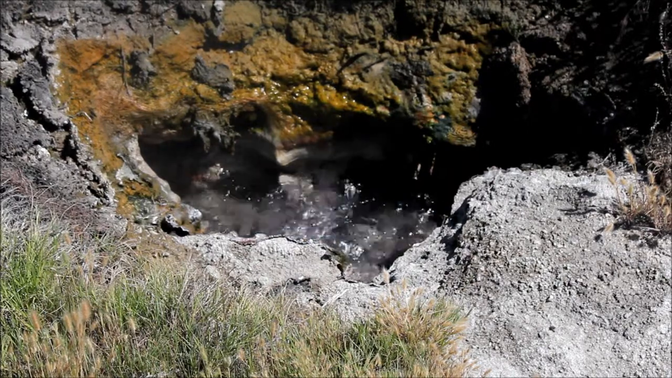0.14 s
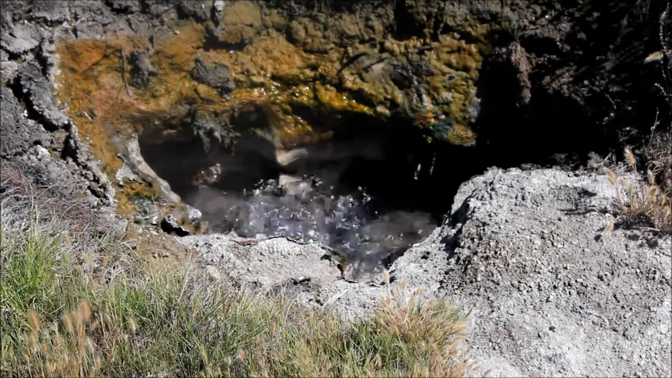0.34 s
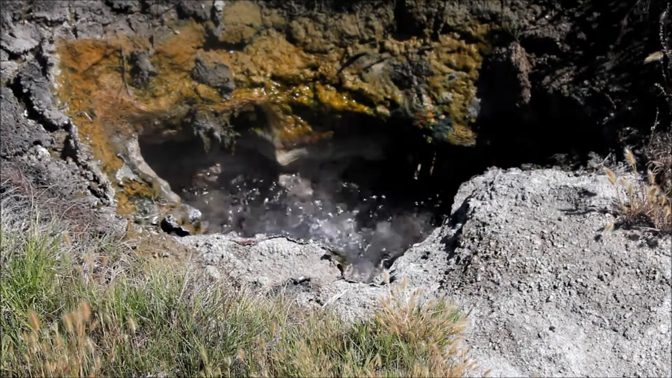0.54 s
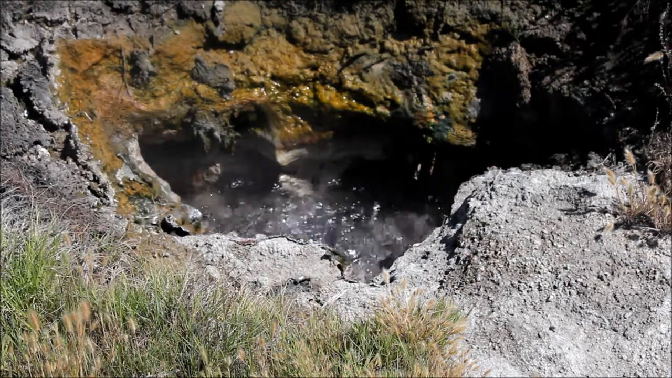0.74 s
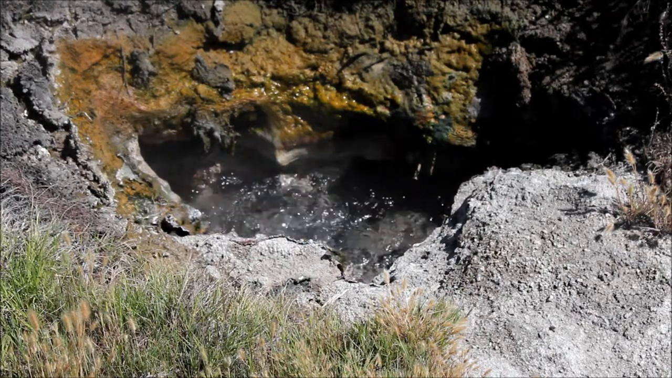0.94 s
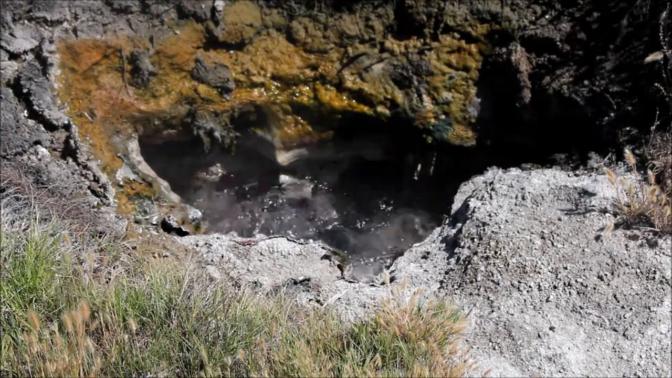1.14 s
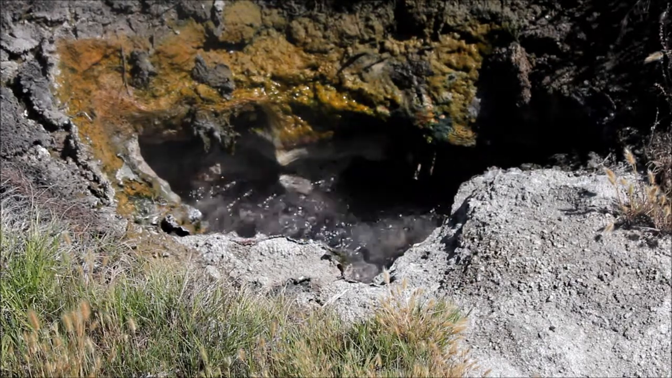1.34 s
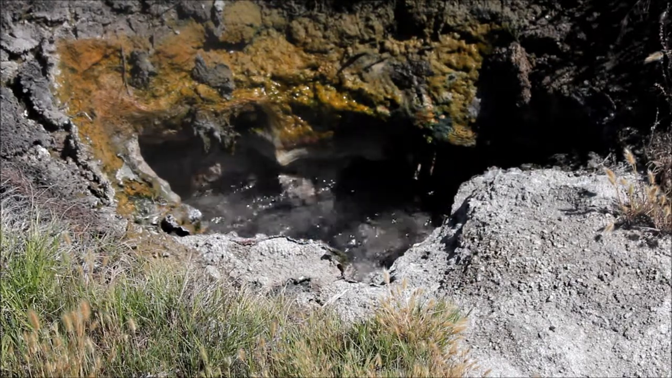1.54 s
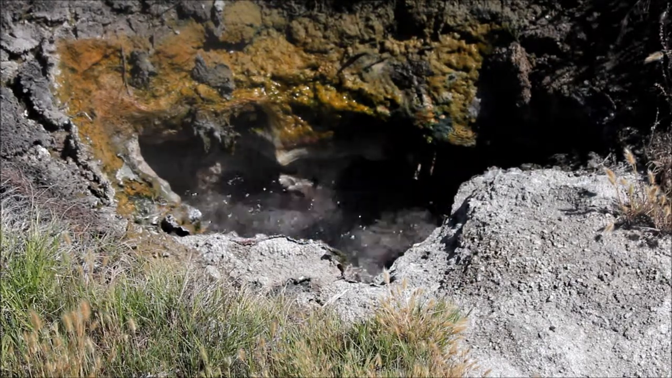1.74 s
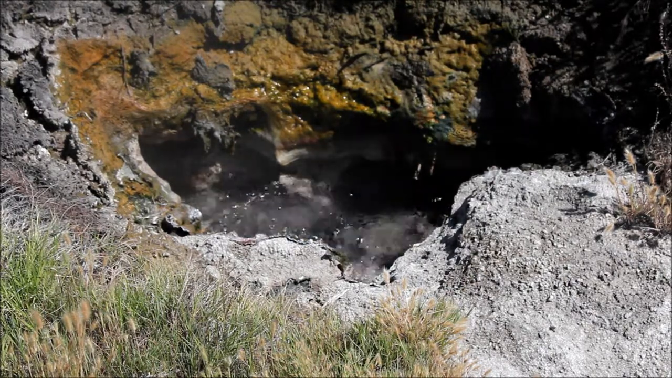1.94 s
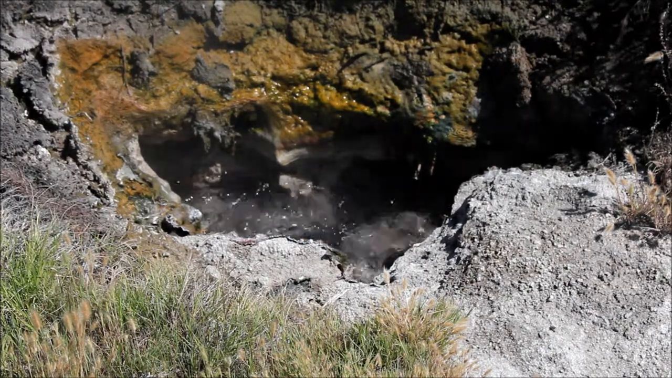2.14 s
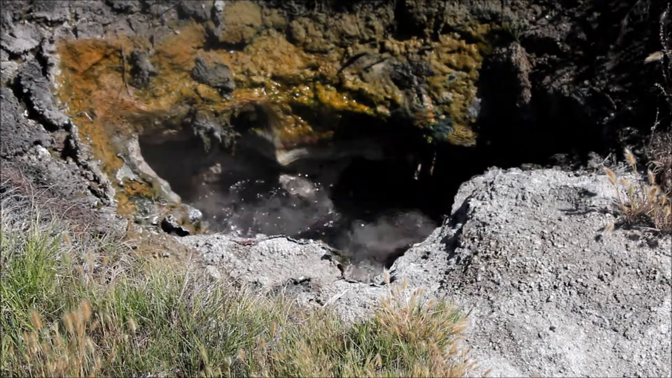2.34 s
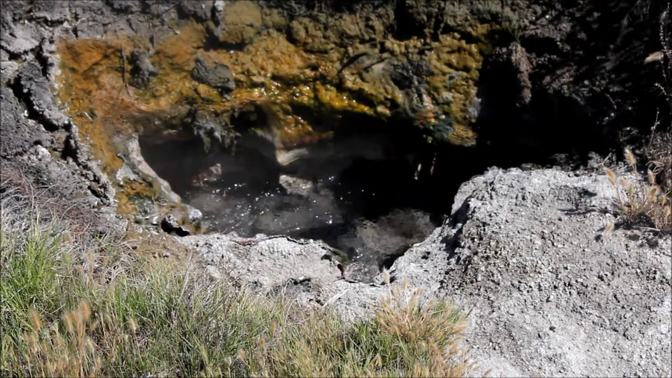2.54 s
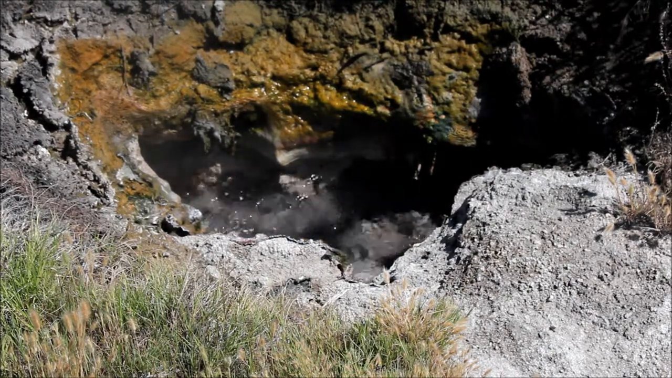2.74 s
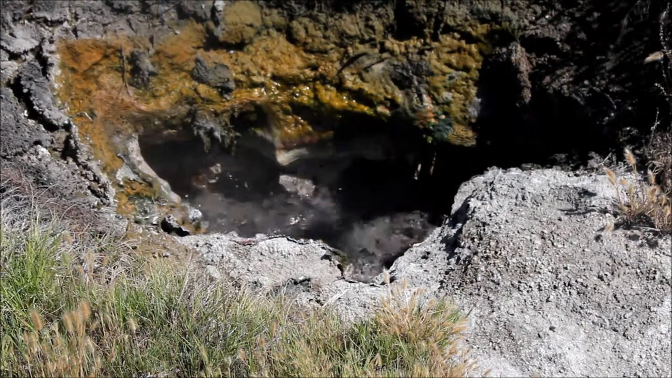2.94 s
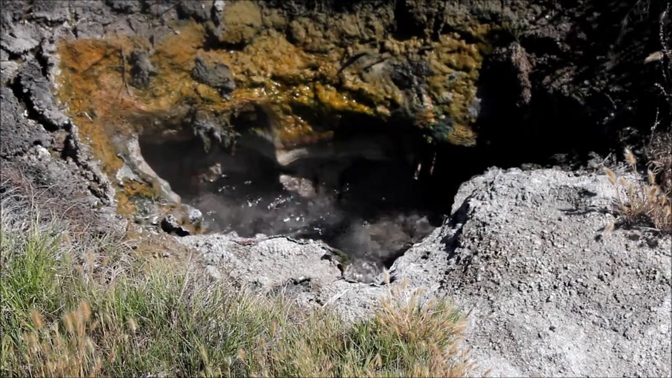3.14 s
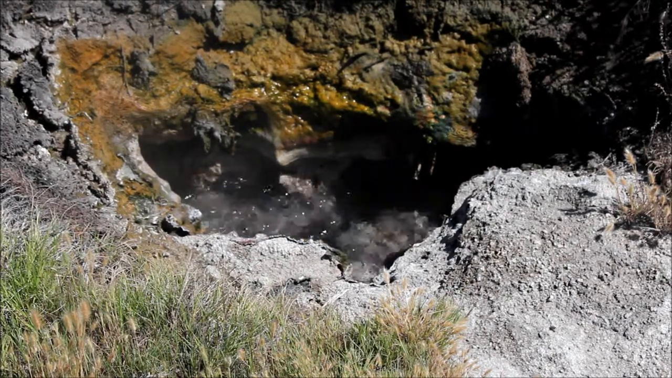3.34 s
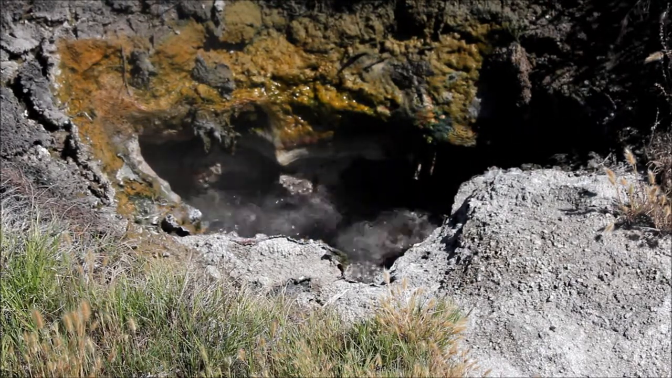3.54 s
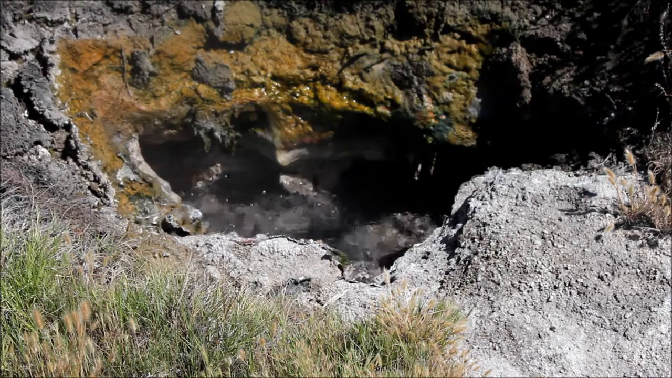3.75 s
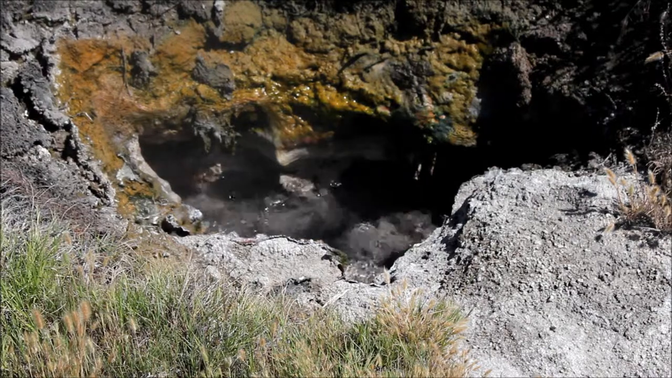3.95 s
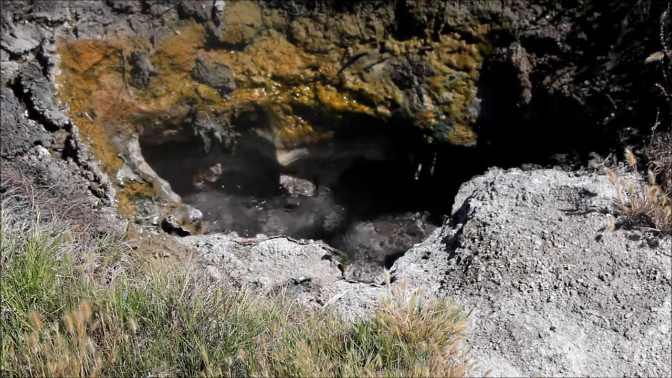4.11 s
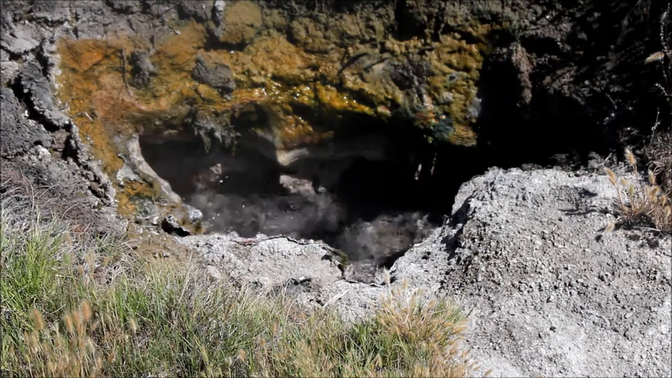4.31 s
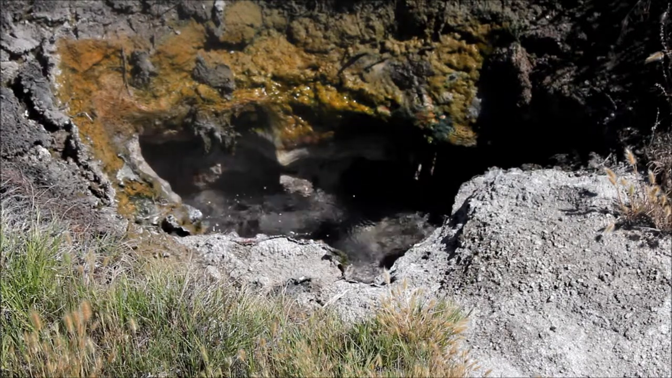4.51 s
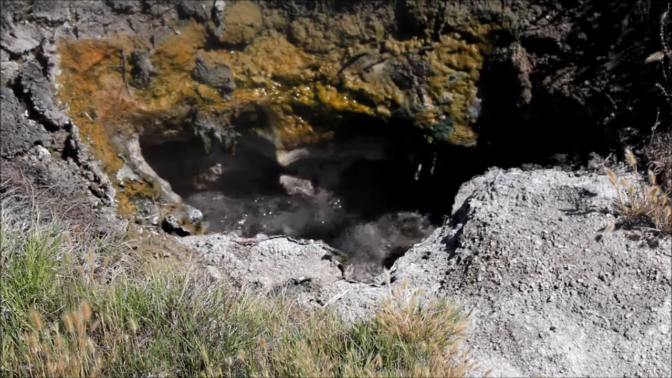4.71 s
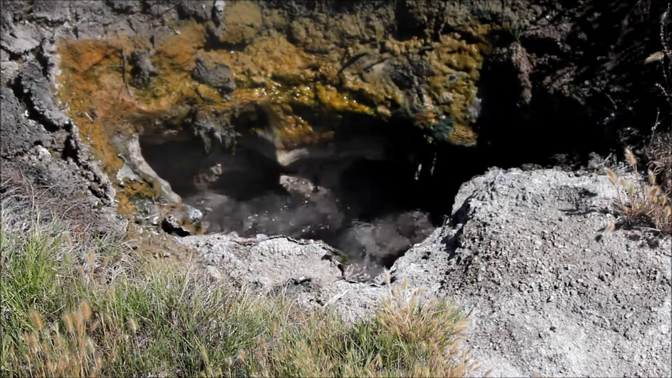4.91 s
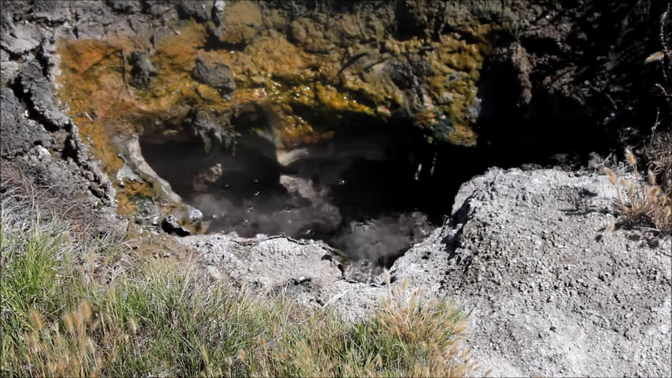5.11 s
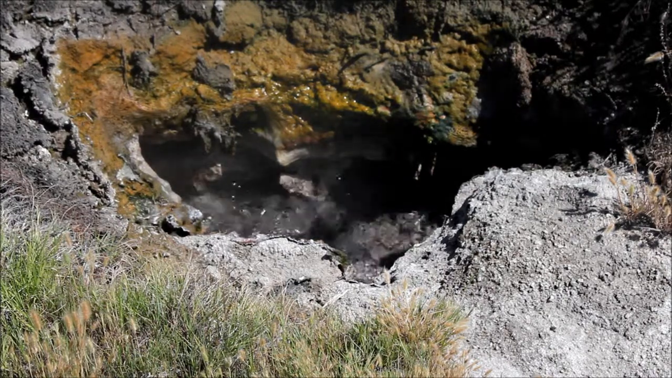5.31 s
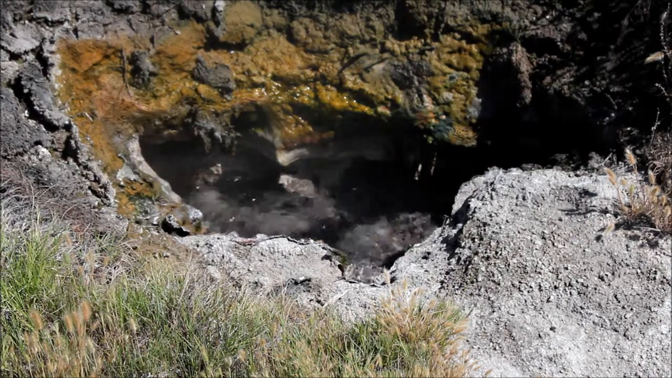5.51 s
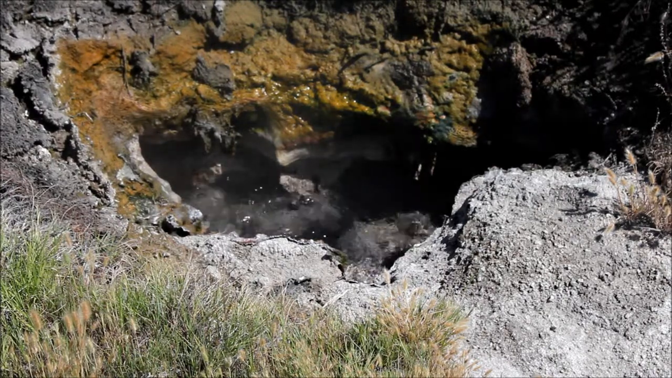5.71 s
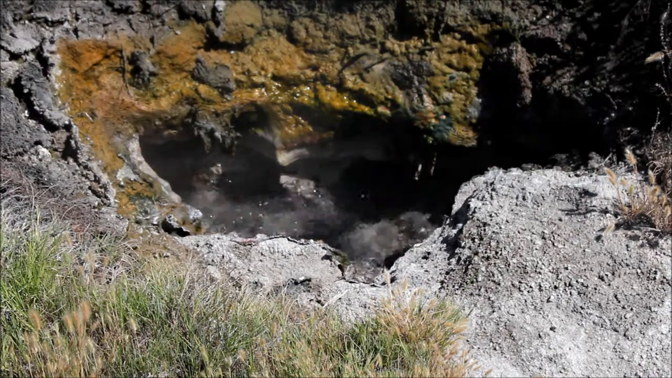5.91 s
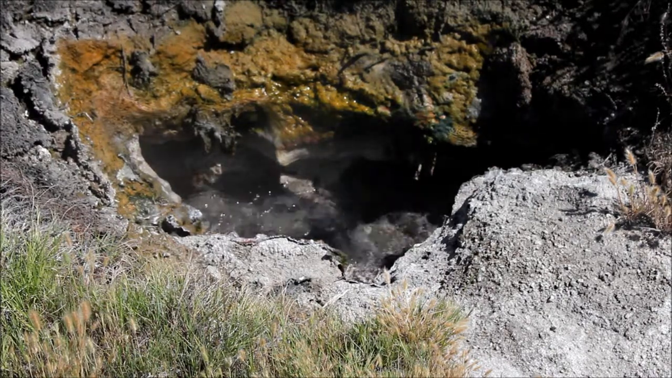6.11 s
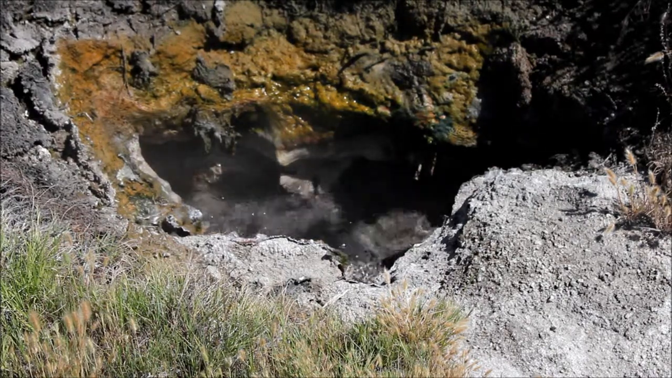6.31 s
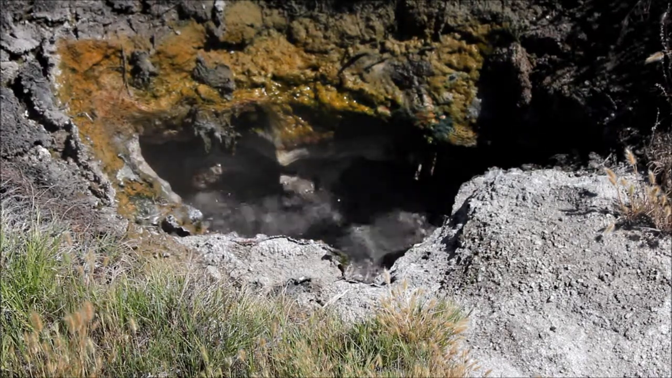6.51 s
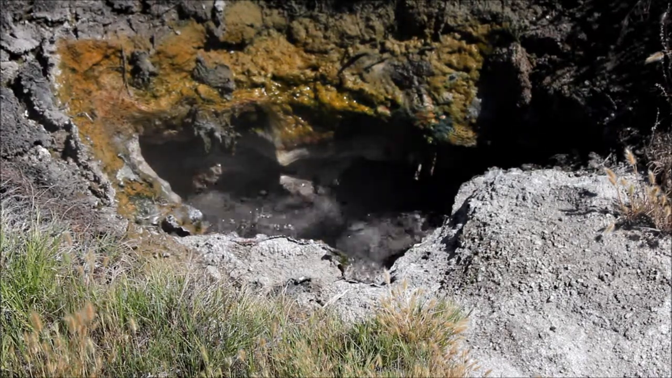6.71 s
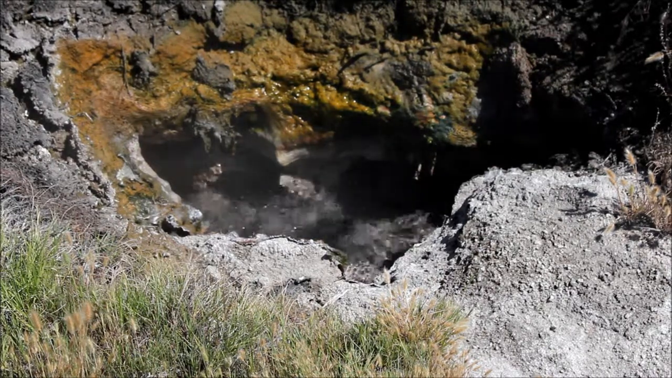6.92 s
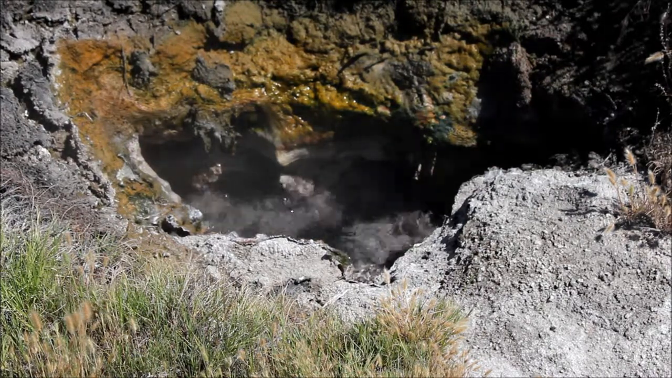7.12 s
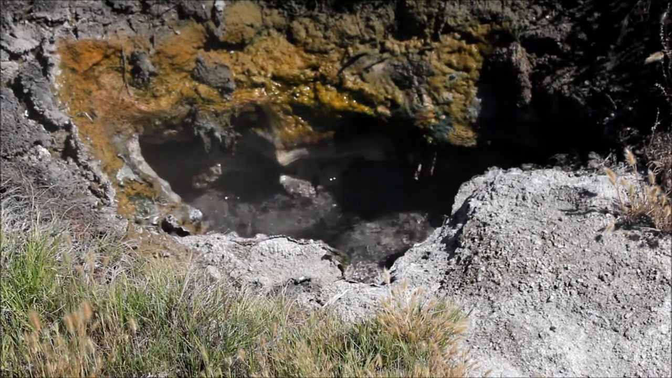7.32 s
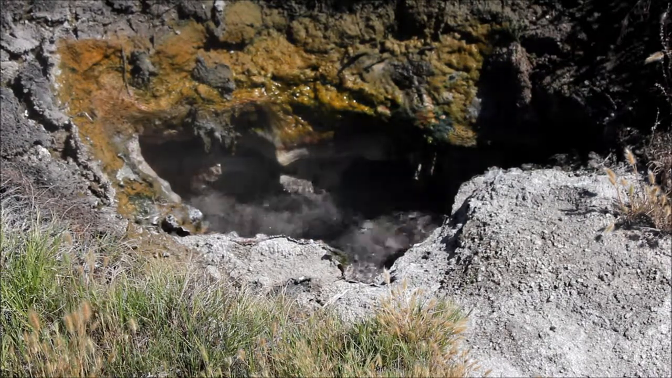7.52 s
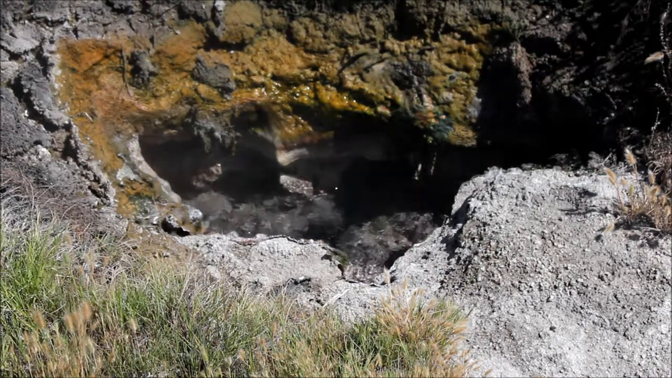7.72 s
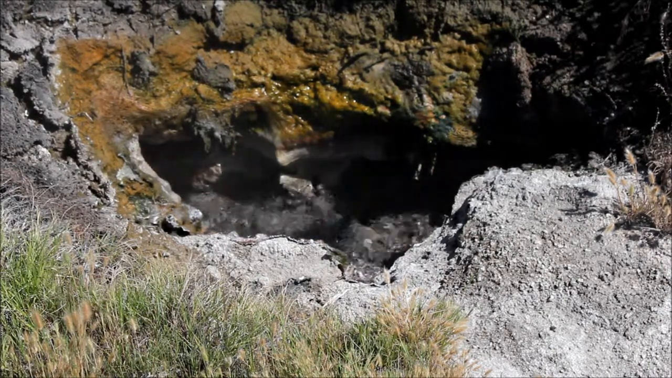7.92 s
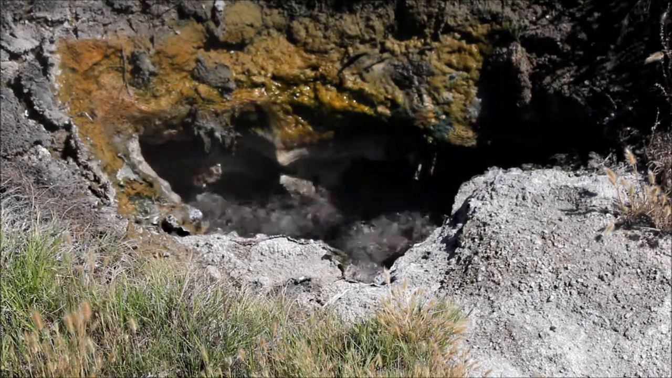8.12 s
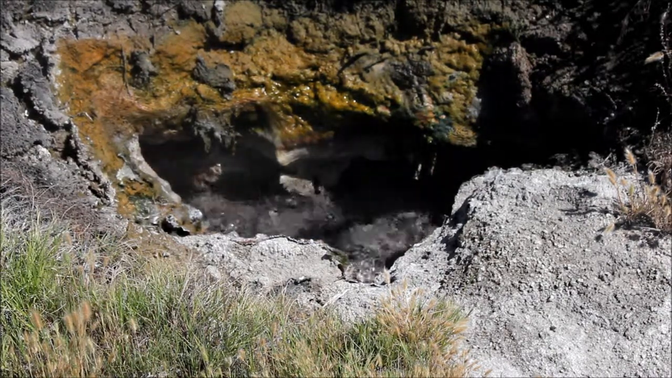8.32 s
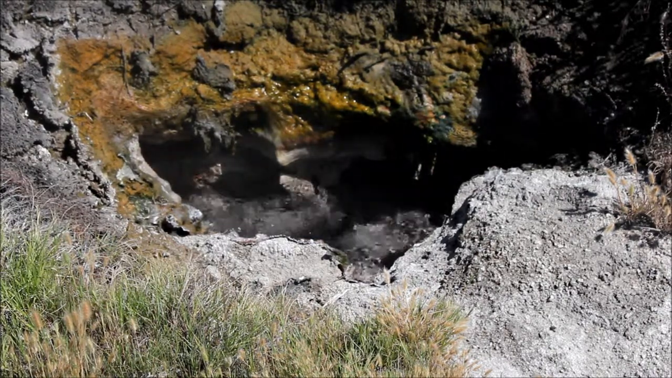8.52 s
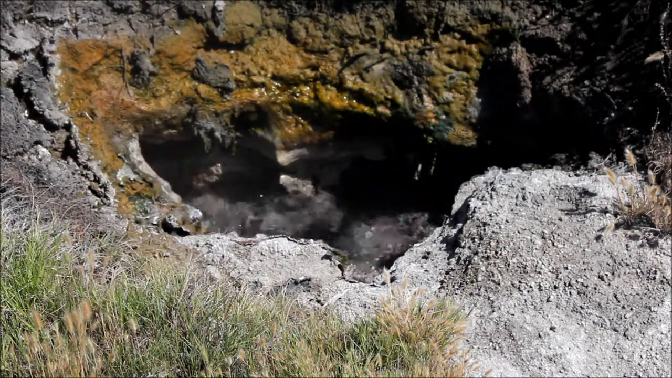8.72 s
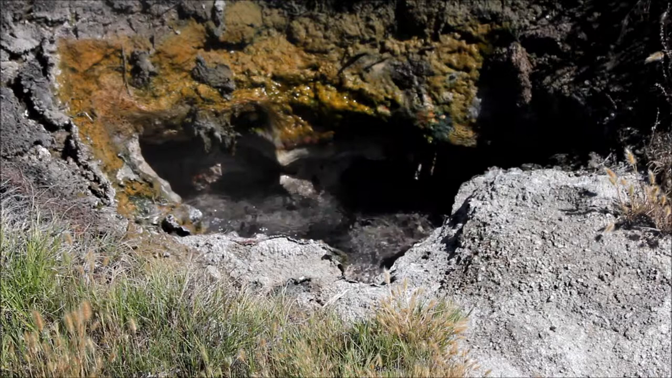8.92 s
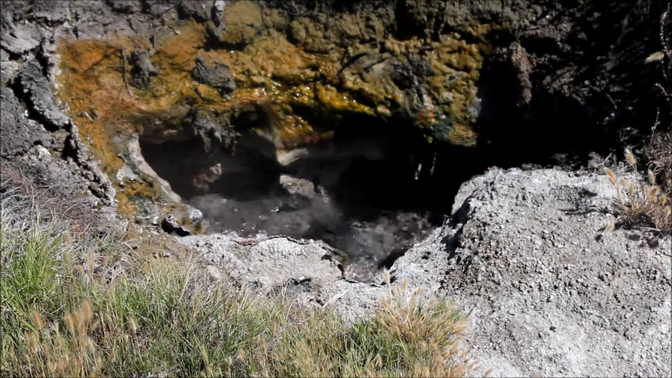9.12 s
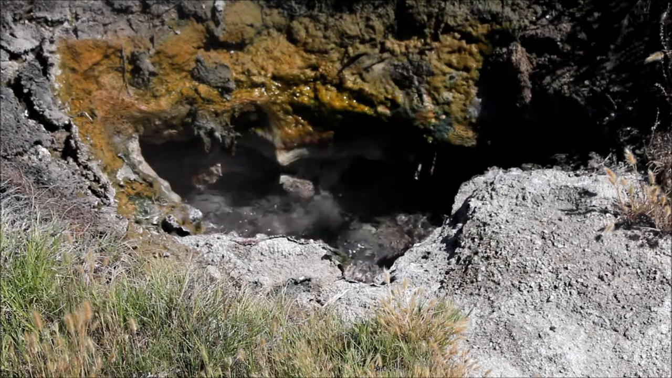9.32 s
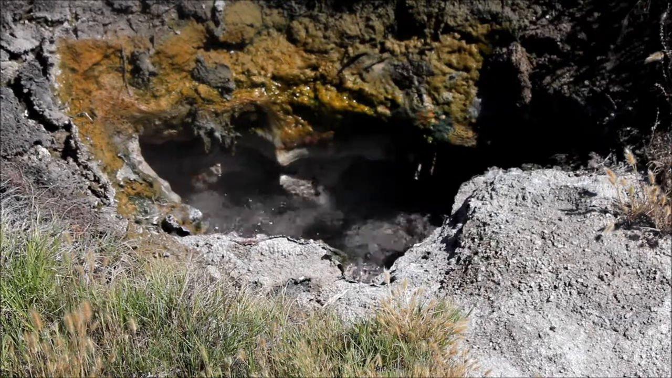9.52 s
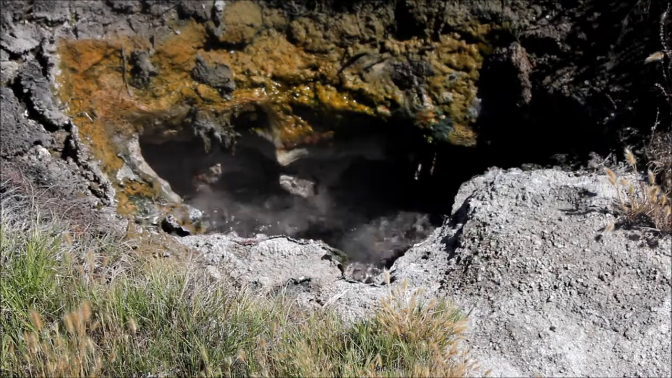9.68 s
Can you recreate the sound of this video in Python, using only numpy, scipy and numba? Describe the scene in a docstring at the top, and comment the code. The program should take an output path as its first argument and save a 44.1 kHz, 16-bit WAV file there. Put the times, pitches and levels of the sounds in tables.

```python
"""Boiling spring with cicadas

A hot spring boils in a small rock hollow outdoors. Swarms of ringing bubbles make the churn, the deep
heave and the gurgle; single tones make the gulps, and tones with a crack of noise make the pops.
Spray is tiny ringing drops, and larger drops are short noise bursts. Clicks ring a cicada's body in about
14 chirps a second, over a fainter cicada; filtered noise makes a distant chorus and a faint hiss.
A far bird whistles once, as a falling sine tone."""
import sys
import numpy as np
from scipy import signal
from scipy.fft import rfft, irfft, next_fast_len
from scipy.io import wavfile
from numba import njit

SR = 44100
rng = np.random.default_rng(int(sys.argv[2]) if len(sys.argv) > 2 else 0)


def dump_mix(stems):
    """Bounce the given channels to the path in sys.argv[1] as a 16-bit WAV at rate SR."""
    frames = np.atleast_2d(stems).T  # one column per channel
    limited = np.clip(frames, -1, 1)  # hard clip at full scale
    pcm = np.round(limited * 32767).astype(np.int16)
    wavfile.write(sys.argv[1], SR, pcm)


N = 429975  # length in samples
T = np.arange(N) / SR  # time in seconds

# Loudness of the rolling boil, before a small trim: t/s, level/dB
BOIL_LEVEL = [(0, -46.5), (.8, -45.5), (1.2, -47.5), (2.3, -45.5), (3.2, -46.5), (4, -47.5), (5.2, -47.5),
              (6.5, -47.5), (8.3, -46.5), (9.75, -46.5)]
# Boil spectrum, with the hollow's resonances: f/Hz, relative level/dB
HOLLOW_SPECTRUM = [(100, -25), (170, -15.5), (260, -12), (350, -10), (450, -2.5), (550, 0), (680, -2),
                   (820, -9), (1030, -4.5), (1400, -10.5), (1750, -9.5), (2450, -12.5), (3300, -24),
                   (6000, -23.5)]
# Deep water between steam pockets, before trims and slow drift: t/s, heave level/dB, gurgle level/dB
SIMMER_LEVELS = [(0, -55, -49.5), (1.2, -63, -50.5), (2.6, -54.5, -52.5), (4.5, -62, -54.5),
                 (7, -63, -54.5), (9.75, -60.5, -52)]
# Spectrum of the deep heave: f/Hz, relative level/dB
DEEP_SPECTRUM = [(20, -6.5), (40, -5), (70, -3), (115, -3), (160, -8), (300, -33), (900, -60)]
# Spectrum of the gurgle: f/Hz, relative level/dB
GURGLE_SPECTRUM = [(70, -29), (140, -4.5), (210, 1.0), (290, -0.5), (360, -24), (600, -23)]
# Big steam pockets; levels are before trims, and the pitch is where the rise starts:
# t/s, peak level/dB, f/Hz, cycles to fade by 60 dB, heave level/dB, gurgle level/dB
STEAM_POCKETS = [(0.285, -34, 84, 7, -50, -58), (0.317, -28.5, 110, 13, -46, -50),
                 (0.42, -39, 75, 5, -49, -63), (0.587, -29, 200, 6.1, -46.5, -48),
                 (0.624, -24, 218, 8, -53, -48), (0.52, -47, 100, 6, -55, -58),
                 (0.84, -53, 130, 6, -55, -52), (1.454, -41, 176, 9.8, -61, -42.5),
                 (1.778, -49, 100, 6, -53, -50), (1.974, -35, 98, 5.3, -52, -57),
                 (2.022, -36, 130, 6, -53, -49), (2.145, -31.5, 144, 5.4, -45.5, -56),
                 (2.653, -28, 175, 5.3, -46, -46), (2.979, -40, 190, 7, -61, -51),
                 (3.38, -48, 200, 7, -59, -51.5), (3.55, -50, 90, 6, -51, -58),
                 (4.16, -51, 200, 7, -59, -47.5), (4.617, -42, 108, 6.7, -55, -67),
                 (4.746, -20.5, 239, 7.9, -67, -42.5), (4.977, -30, 79.6, 3.9, -54, -65),
                 (5.025, -37, 78.1, 8, -51, -60), (5.12, -31.5, 210, 7, -66, -48.5),
                 (5.774, -38, 113, 6.4, -49, -54), (5.902, -49, 231, 7.7, -60, -47),
                 (6.293, -39, 190, 5.6, -69, -51), (6.655, -32, 240, 9.7, -66, -53),
                 (7.59, -51, 111, 6, -57, -58), (8.02, -34.5, 213.7, 6.2, -69, -60),
                 (8.596, -35.5, 170, 6.1, -43.5, -50), (9.398, -34.5, 272, 11, -65, -44),
                 (9.606, -35.5, 169, 4.9, -65, -47)]
# Bursting domes; the pitch is where the rise starts: t/s, peak level of the ring/dB, f/Hz,
# cycles to fade by 60 dB
BURSTS = [(0.017, -32, 5760, 9.9), (0.036, -30, 730, 4), (0.219, -37, 6030, 14), (0.414, -38, 4650, 14),
          (0.448, -30, 785, 2.8), (0.504, -30, 1180, 2.2), (0.743, -31, 805, 7.9), (0.759, -33.5, 4480, 14),
          (0.783, -30, 1280, 2.5), (0.794, -32.5, 620, 6), (0.784, -27, 3100, 10), (0.826, -30.5, 2420, 6),
          (0.924, -36, 1630, 5.4), (0.993, -35.5, 5360, 14), (1.027, -33, 2980, 16), (1.116, -33, 1200, 29),
          (1.116, -26, 3090, 31), (1.374, -38, 4010, 14), (2.063, -37, 830, 8), (2.552, -40, 846, 8),
          (2.838, -41, 3900, 16), (4.852, -37, 5000, 14), (4.934, -33.5, 754, 3.7), (4.936, -36, 2850, 17),
          (5.38, -44, 3170, 15), (6.6812, -20, 860, 5.2), (6.688, -31.5, 760, 8), (7.109, -43, 2800, 12),
          (8.51, -42, 3230, 14), (8.54, -37, 1500, 5.5), (8.564, -38, 1870, 7), (8.608, -34.5, 3600, 5),
          (9.152, -35, 690, 7), (9.344, -34, 880, 6.1)]
# Larger drops hitting water and rock; all levels are before trims:
# t/s, peak level of the tick/dB, slap relative to the tick/dB, level of the flurry around it/dB
LARGE_DROPS = [(0.0143, -30.5, -10.5, -47), (0.2187, -32, -15, -69), (0.41, -31, -8, -55),
               (0.479, -33, -17, -58), (0.497, -30, -13, -51.5), (0.7517, -49, 0, -50.5),
               (0.79, -26.5, -8, -46), (0.814, -37, -6, -57), (0.845, -42, -2, -60), (0.9478, -43, 0, -59),
               (1.1157, -30.5, -6, -64), (1.41, -43, -5, -59), (1.6462, -38, -10, -65),
               (2.21, -41, -14, -58), (2.54, -45, -10, -58), (2.837, -43, -1, -61), (3.18, -43, -5, -57),
               (3.5553, -37, -13, -62), (4.2896, -46, -15, -70), (4.3829, -40, -16, -53.5),
               (4.8506, -34.5, -16, -68), (5.38, -48, -5.5, -63), (5.5585, -45, -15, -68),
               (6.008, -40, -2, -54), (6.02, -42, -4, -64), (6.4742, -42, -23, -74), (8.41, -43, -3, -60),
               (8.5031, -49, -10, -53.5), (8.545, -42, -6, -56)]
# Fine spray between the large drops, before trims: t/s, level/dB
SPRAY_LEVEL = [(0, -59.5), (1.5, -61.5), (2.6, -63.5), (3.5, -71), (4.3, -75), (8.1, -74), (8.7, -68.5),
               (9.75, -63.5)]
# Spectrum of the fine spray: f/Hz, relative level/dB
SPRAY_SPECTRUM = [(500, -25), (1200, 10), (3000, 2), (5000, 1.5), (8000, 3.5), (12000, 3.5), (16000, 4.5)]
# The near cicada's loudness, before a small trim: t/s, level/dB
SONG_LEVEL = [(0, -50.5), (0.6, -55), (1.0, -50.5), (1.6, -52.5), (1.8, -50), (2.35, -48), (3.0, -50.5),
              (3.75, -55.5), (4.5, -50.5), (4.85, -54.5), (5.5, -49.5), (5.75, -56.5), (6.1, -49.5),
              (6.95, -55), (7.55, -50), (8.25, -56.5), (8.6, -51.0), (9.2, -56.5)]
# Its body resonance, tightened once and slackened once, before sag and wobble: t/s, f/Hz
BODY_PITCH = [(0, 7850), (2.4, 7880), (4.5, 7850), (5.13, 8260), (5.5, 7870), (6.1, 7820), (6.42, 7400),
              (6.9, 7900), (9.75, 8080)]
# Its pace, steady but for two brief spurts: t/s, chirps per second/Hz
CHIRP_PACE = [(0, 14.33), (2.5, 14.31), (2.8, 15.2), (3.1, 14.46), (8.5, 14.46), (8.9, 14.9), (9.4, 14.45)]
# One chirp swells and breaks off: share of the cycle (0 to 1), drive level/dB
CHIRP_SHAPE = [(0, -17), (.12, -9.5), (.3, -5), (.48, -.5), (.68, -3), (.75, -15), (1, -14)]
# Spectrum of the distant chorus: f/Hz, relative level/dB
CHORUS_SPECTRUM = [(4000, -50), (6300, -14), (6900, -5), (7800, -0.5),
                   (8500, -4), (9300, -12), (12000, -32)]
# The bird's whistle: t/s, f/Hz, level of the sine peak/dB
WHISTLE = [(6.04, 3460, -120), (6.055, 3430, -59), (6.09, 3320, -66),
           (6.14, 3290, -63), (6.17, 3260, -68), (6.2, 3250, -120)]
# Spectrum of the faint hiss: f/Hz, relative level/dB
HISS_SPECTRUM = [(30, -33), (300, 12.5), (2000, 2), (4500, 1.5), (6500, -4), (10000, -0.5), (16000, -1.5)]

SWELL_S, SETTLE_S = 0.074, 0.089  # the pool swells ahead of a steam pocket, then settles
GATHER_S, SCATTER_S = 0.0089, 0.026  # spray gathers around a large drop, then thins out
UNREST_DB = 0.5  # slow random rise and fall of the heave; half as much for the gurgle
TICKS_DB = -66  # droplets on rock, before reflections
FIRST_CHIRP_S = .006
NEAR_CLICK_HZ, FAR_CLICK_HZ = 390.3, 377  # clicks per second
CLICK_S = .00016  # time scale of one click; it peaks three times this long after its start
RING_WIDTH_HZ = 1000  # how far the clicks spread either side of the resonance
# The farther cicada's averages: level/dB, resonance/Hz, chirps per second
FAR_DB, FAR_HZ, FAR_RATE = -60.74, 7900, 13.1
HISS_DB = -59.5
TOP_HZ = 15600


def undb(db):
    """Turn decibels into gain."""
    return 10 ** (np.asarray(db) / 20)


def unit(x):
    """Scale to an average (rms) strength of 1."""
    return x / np.sqrt(np.mean(x ** 2))


def curves(table):
    """Draw each column of a time table as a curve, sample by sample."""
    s, *columns = np.transpose(table)
    return [np.interp(T, s, c) for c in columns]


def colour(x, points):
    """Shape a sound with a spectrum and bring it to rms 1."""
    hz, db = np.transpose(points)
    size = next_fast_len(N)
    f = np.maximum(np.arange(size // 2 + 1) * SR / size, 1)
    gain = undb(np.interp(np.log(f), np.log(hz), db))
    return unit(irfft(rfft(x, size) * gain, size)[:N])


def band(x, low_hz, high_hz):
    """Gently keep only a range of pitches."""
    return signal.sosfilt(signal.butter(2, [low_hz, high_hz], "band", fs=SR, output="sos"), x)


def walk(rate):
    """Wander at random, with `rate` new targets a second and a spread near 1."""
    steps = rng.standard_normal(4096)
    return np.interp(T * rate, np.arange(len(steps)), steps) * np.sqrt(3 / 2)


def add(out, s, sound):
    """Mix in a short sound at time s."""
    i = int(s * SR)
    out[i:i + len(sound)] += sound[:max(N - i, 0)]


@njit
def ring(start, hz, cycles, size, rise):
    """Sum fading bubble tones whose pitch climbs as they near the surface."""
    out = np.zeros(N)
    for k in range(len(start)):
        length = int(cycles[k] * SR / hz[k]) + 2
        turn = 2j * np.pi * hz[k] / SR
        step = np.exp(turn - 6.9 / length)  # fades by 60 dB over its length
        glide = np.exp(turn * rise / length)
        z = size[k] + 0j
        for i in range(start[k], min(start[k] + length, N)):
            out[i] += z.imag
            z, step = z * step, step * glide
    return out


def swarm(low_hz, high_hz, cycles, spread_db, rise, count):
    """Ring bubbles of random size and moment, with a flat spectrum on average; rms 1."""
    when, pitch, damping, force, sign = rng.random((count, 5)).T
    hz = low_hz + (high_hz - low_hz) * pitch
    boost_db = -spread_db * np.log(np.maximum(force, 1 / 300))  # a few are much louder
    size = np.sqrt(hz) * undb(boost_db) * np.sign(sign - .5)
    return unit(ring((when * N).astype(np.int64), hz, cycles * (.5 + damping), size, float(rise)))


def bubble(hz, cycles, swell, rise):
    """Ring one cavity: it swells over `swell` cycles, then fades with climbing pitch; peak 1."""
    turn = T[:SR // 5] * hz
    life = np.minimum(turn / cycles, 2)
    onset = 1 - np.exp(-(turn / swell) ** 2)
    fade = np.exp(-np.log(1000) * life)
    y = onset * fade * np.sin(2 * np.pi * turn * (1 + rise * life))
    return y / np.abs(y).max()


def rocks(x, t60, wet_db):
    """Add a scatter of reflections from rough rock, fading by 60 dB in t60 seconds."""
    t = T[:SR // 3]
    tail = rng.standard_normal(len(t)) * undb(-60 * t / t60) * (t > .002)
    return x + undb(wet_db) * signal.fftconvolve(x, tail / np.linalg.norm(tail))[:N]


def stirred(calm_db, times, peaks_db, attack_s, release_s):
    """Raise a level around each event and let it calm again, by adding powers; gives dB."""
    power = undb(calm_db) ** 2
    for s, db in zip(times, peaks_db):
        near = slice(int(max(s - 4 * attack_s, 0) * SR), int((s + 4 * release_s) * SR))
        age = T[near] - s
        shape = np.exp(np.where(age < 0, -(age / attack_s) ** 2, -age / release_s))
        power[near] += (undb(db) * shape) ** 2
    return 10 * np.log10(power)


def churn(level_db):
    """The rolling boil: dense bubbles coloured by the hollow's resonances."""
    bubbles = swarm(low_hz=106.7, high_hz=5940, cycles=10.9, spread_db=2.0, rise=0.29, count=80000)
    return colour(bubbles, HOLLOW_SPECTRUM) * undb(level_db + 0.14 + .5 * walk(25))


def heave(level_db, gurgle_db):
    """Deep steam pockets that fade fast shake the pool; smaller ones gurgle above them."""
    pockets = swarm(low_hz=22, high_hz=274, cycles=4.2, spread_db=2.5, rise=0.073, count=3500)
    small = swarm(low_hz=113, high_hz=385, cycles=11.3, spread_db=2.3, rise=0.14, count=1800)
    deep = colour(pockets, DEEP_SPECTRUM) * undb(level_db - 0.5)
    gurgle = colour(small, GURGLE_SPECTRUM) * undb(gurgle_db - 4.5)
    return deep + gurgle


def surges():
    """Each steam pocket sets the deep water heaving and gurgling."""
    calm_heave, calm_gurgle = curves(SIMMER_LEVELS)
    unrest = UNREST_DB * walk(9.8)
    s, *_, heave_db, gurgle_db = np.transpose(STEAM_POCKETS)
    heave_level = stirred(calm_heave + unrest, s, heave_db, SWELL_S, SETTLE_S)
    gurgle_level = stirred(calm_gurgle + .5 * unrest, s, gurgle_db, SWELL_S, SETTLE_S)
    return heave(heave_level, gurgle_level)


def gulps():
    """Large pockets surface with a short low gulp, a ringing cavity that climbs in pitch."""
    out = np.zeros(N)
    for s, db, hz, cycles, *_ in STEAM_POCKETS:
        add(out, s + 0.0015, undb(db - 3.2) * bubble(hz, cycles, swell=0.78, rise=0.045))
    return rocks(out, t60=0.081, wet_db=-8.5)


def pops():
    """A dome tears with a wet crack of noise and its cavity rings."""
    out, t = np.zeros(N), T[:SR // 5]
    for s, db, hz, cycles in BURSTS:
        crack = band(rng.standard_normal(len(t)), .3 * hz, 1.17 * hz) * t * np.exp(-t / 0.0016)
        crack /= np.abs(crack).max()
        cavity = bubble(hz, cycles, swell=1.9, rise=.03)
        add(out, s, undb(db) * (cavity + undb(-9.5) * crack))
    return rocks(out, t60=.03, wet_db=-10.5)


def spray(level_db):
    """Fine droplets fizz as very short rings; tiny bubbles plink longer among them."""
    drops = swarm(low_hz=910, high_hz=17600, cycles=3.0, spread_db=4.0, rise=0.12, count=60000)
    plinks = swarm(low_hz=2190, high_hz=5500, cycles=15, spread_db=2.5, rise=.08, count=420)
    fizz = colour(drops, SPRAY_SPECTRUM) * undb(level_db + 6.5 + 0.85 * walk(70))
    return fizz + plinks * undb(level_db - 6.5)


def flurries():
    """Each large drop comes down in a flurry of spray; stray droplets tick on rock throughout."""
    s, *_, flurry_db = np.transpose(LARGE_DROPS)
    level_db = stirred(*curves(SPRAY_LEVEL), s, flurry_db, GATHER_S, SCATTER_S)
    droplets = swarm(low_hz=9000, high_hz=16000, cycles=4, spread_db=2.0, rise=.05, count=600)
    ticks = rocks(band(droplets, 9900, 17000), t60=0.018, wet_db=1)
    return spray(level_db) + ticks * undb(TICKS_DB)


def splats():
    """Larger drops hit as noise bursts: a sharp tick, a brief scatter and a duller slap."""
    out, t = np.zeros(N), T[:SR // 20] - .005
    for s, db, slap_db, _ in LARGE_DROPS:
        contact = np.exp(-np.abs(t) / 0.00035)
        scatter = np.exp(np.minimum(t / 0.0032, -t / 0.0031))
        hit = rng.standard_normal(len(t)) * (contact + undb(5) * scatter)
        tick, slap = band(hit, 7000, 16900), band(hit, 750, 7000)
        both = (tick + undb(slap_db + 10.0) * slap) / np.abs(tick).max()
        add(out, s - .0035, undb(db + 0.5) * both)
    return out


def cicada(level_db, body_hz, rate, click_hz):
    """Clicks of a ribbed plate keep the body ringing; each chirp swells, sags in pitch and breaks off."""
    cycle = (np.cumsum(rate) / SR - rate[0] * FIRST_CHIRP_S + .02 * walk(8)) % 1
    effort = undb(np.interp(cycle, *np.transpose(CHIRP_SHAPE)) + .9 * walk(25))
    # the muscle keeps a steady click rate; weak clicks come less evenly
    click_phase = (click_hz * T + .008 * walk(200) / effort) % 1
    age = click_phase / click_hz / CLICK_S
    clicks = age ** 3 * np.exp(-age) * undb(walk(click_hz))
    # the ring drags as each click dies; it is clean in strong clicks and rough in weak ones
    phase = .24 * walk(click_hz) / effort - .15 * age
    drive = effort * clicks * np.exp(1j * phase)
    swing = signal.sosfilt(signal.butter(3, RING_WIDTH_HZ, fs=SR, output="sos"), drive)
    sag = 1 - .28 * np.clip(cycle - .42, 0, .33) ** 2
    ring_hz = body_hz * sag * (1 + .004 * walk(14))
    song = np.real(swing * np.exp(2j * np.pi * np.cumsum(ring_hz) / SR))
    return unit(rocks(song, t60=.1, wet_db=-15)) * undb(level_db)


def cicadas():
    """A near cicada and a fainter one, at different paces, drift in and out of step."""
    song_db, = curves(SONG_LEVEL)
    near = cicada(song_db - 0.24, *curves(BODY_PITCH), *curves(CHIRP_PACE), NEAR_CLICK_HZ)
    far_hz = FAR_HZ * (1 + .015 * walk(1))
    far = cicada(FAR_DB + 2 * walk(1), far_hz, FAR_RATE + .5 * walk(1), FAR_CLICK_HZ)
    return near + far


def chorus():
    """Distant cicadas blur into a narrow hiss, made of filtered noise."""
    return colour(rng.standard_normal(N), CHORUS_SPECTRUM) * undb(-57.0 + 1.0 * walk(9))


def bird():
    """One faint falling whistle from far off, a pure sine tone."""
    hz, db = curves(WHISTLE)
    return undb(db) * np.sin(2 * np.pi * np.cumsum(hz) / SR)


def hiss():
    """A faint steady hiss, made of filtered noise."""
    return colour(rng.standard_normal(N), HISS_SPECTRUM) * undb(HISS_DB)


def scene():
    """Mix the spring, the insects, the bird and the hiss."""
    water = churn(*curves(BOIL_LEVEL)) + surges() + gulps() + pops() + flurries() + splats()
    return (water + cicadas() + chorus() + bird() + hiss())[None]


def record(dry):
    """Cut the treble steeply above TOP_HZ."""
    return signal.sosfilt(signal.ellip(10, .2, 70, TOP_HZ, fs=SR, output="sos"), dry)


dry = scene()
out = record(dry)
dump_mix(out)
```